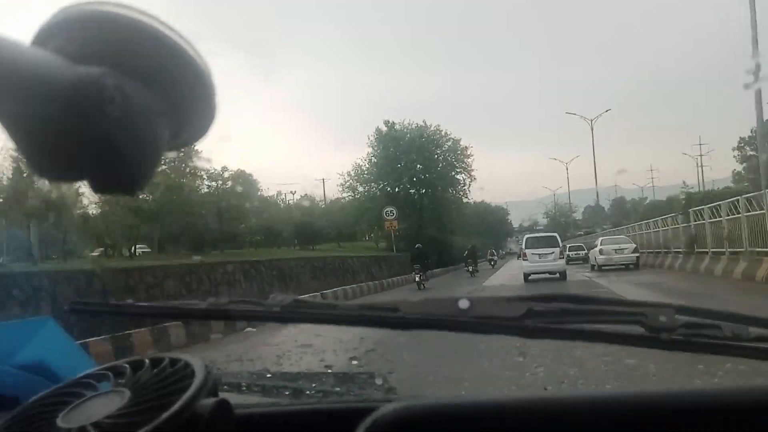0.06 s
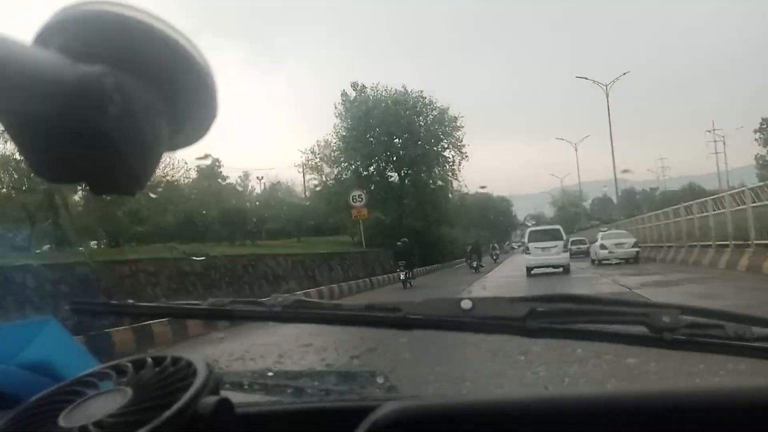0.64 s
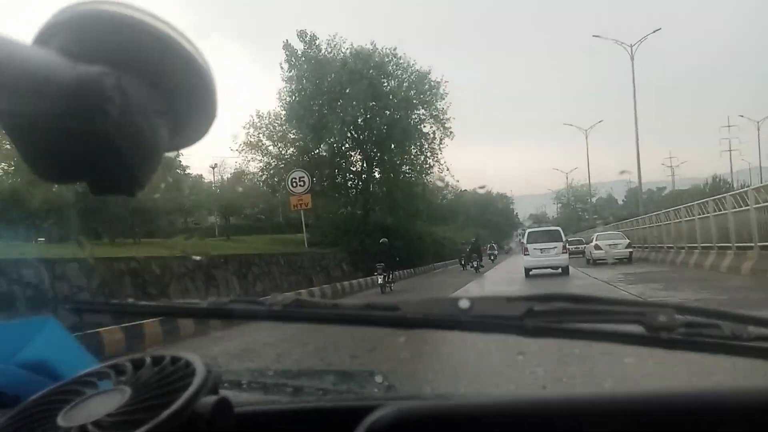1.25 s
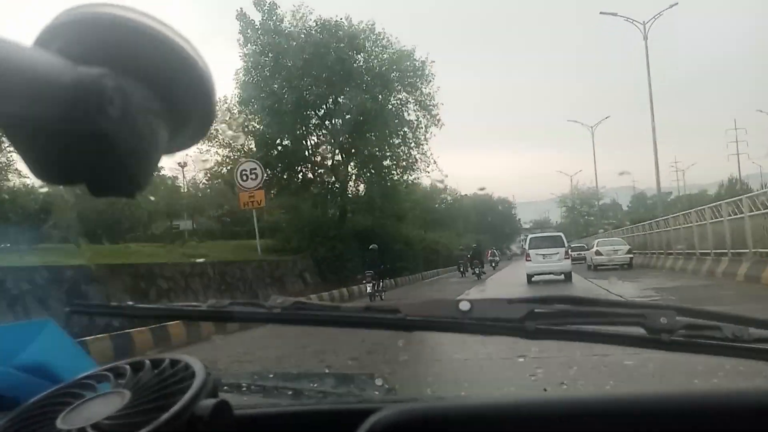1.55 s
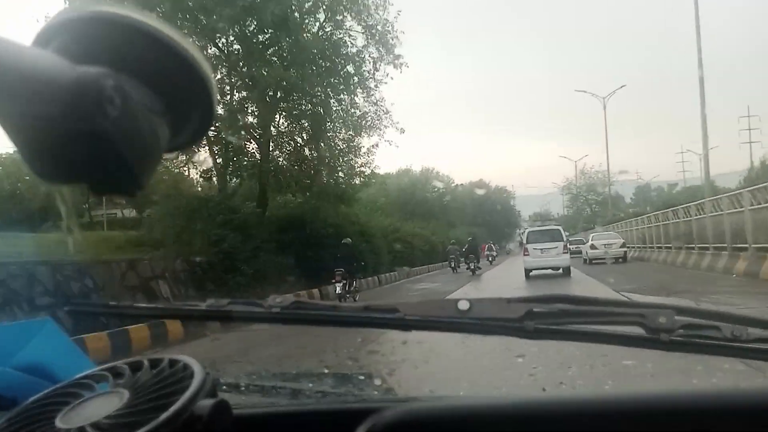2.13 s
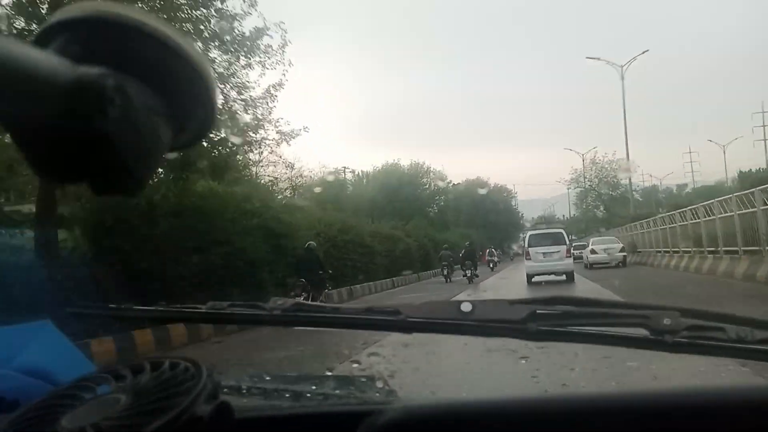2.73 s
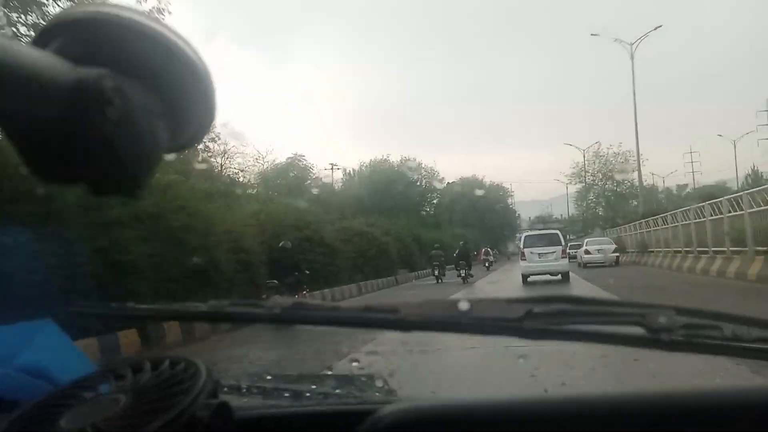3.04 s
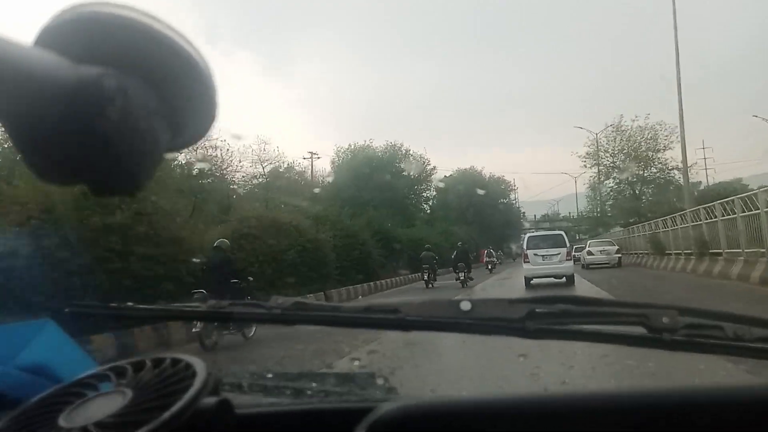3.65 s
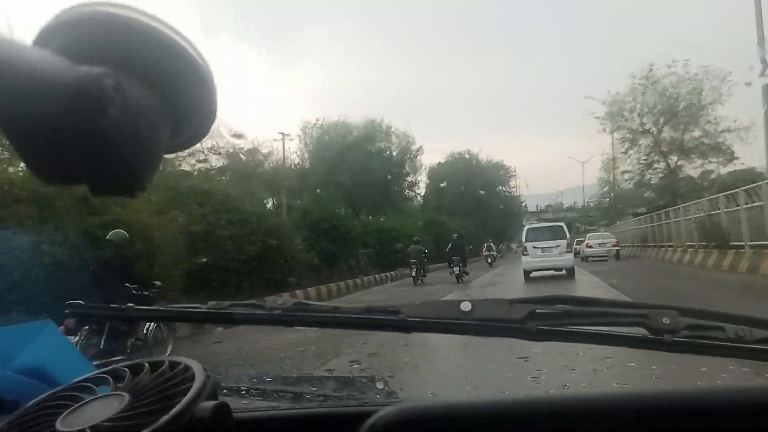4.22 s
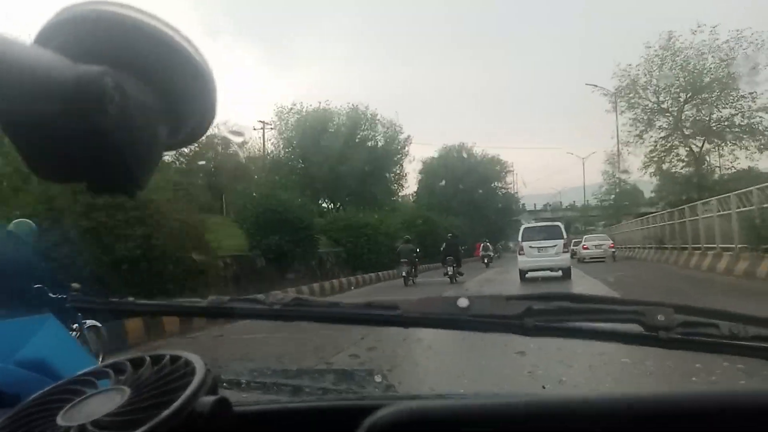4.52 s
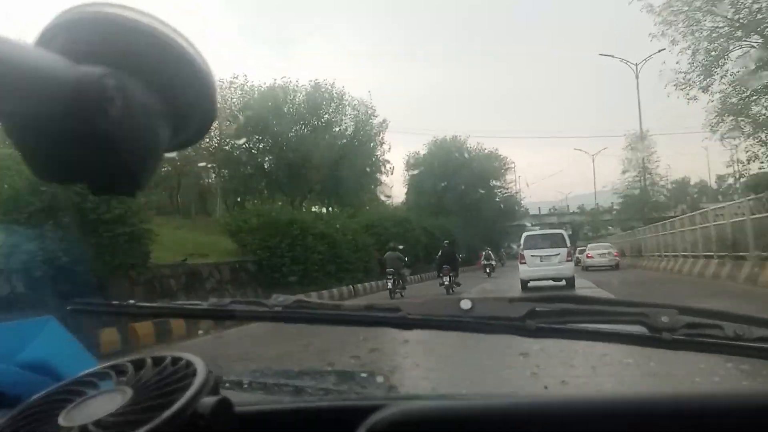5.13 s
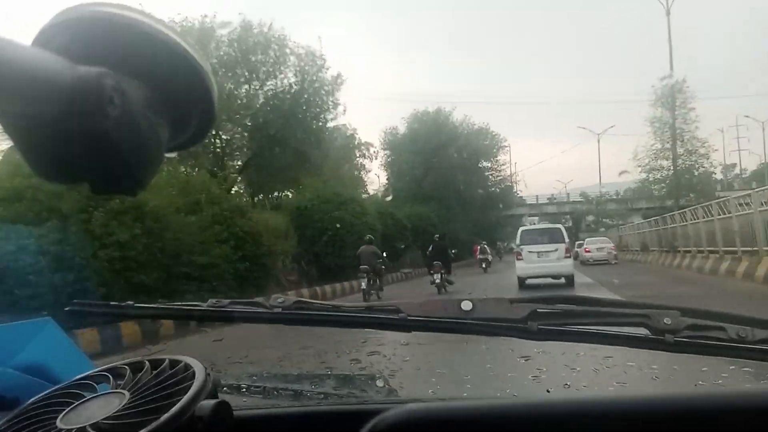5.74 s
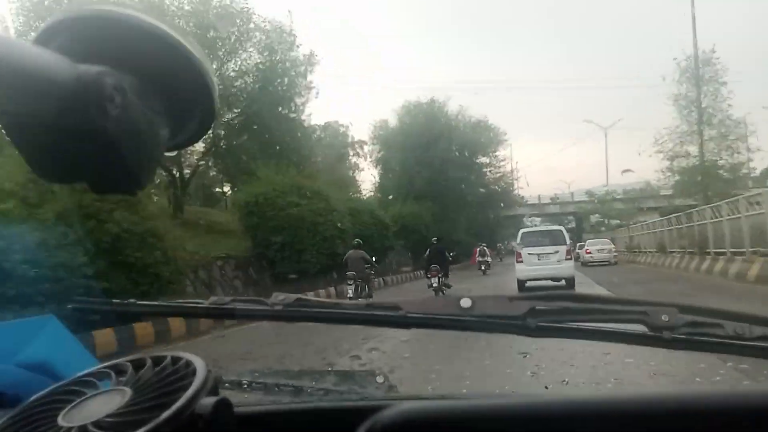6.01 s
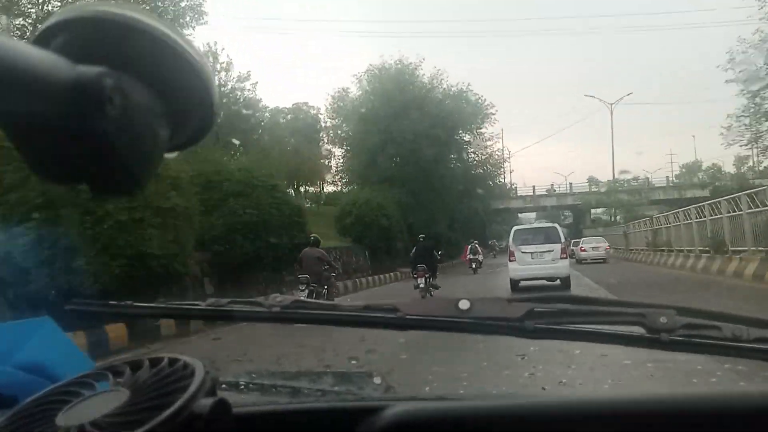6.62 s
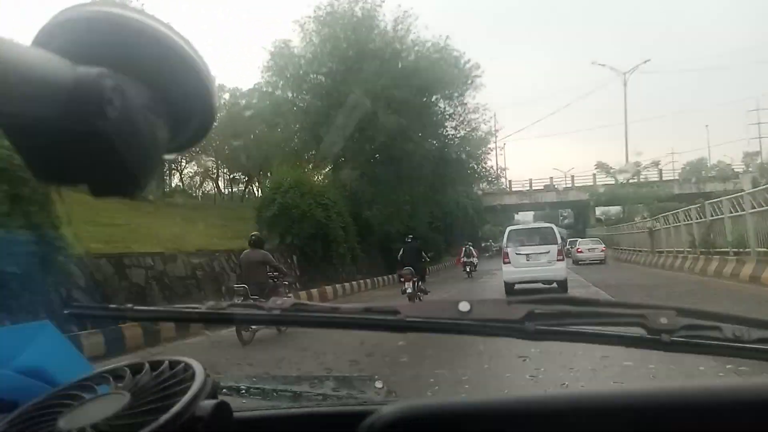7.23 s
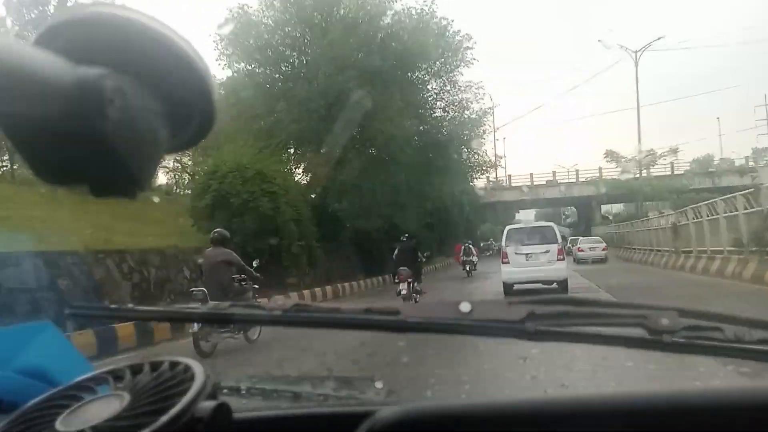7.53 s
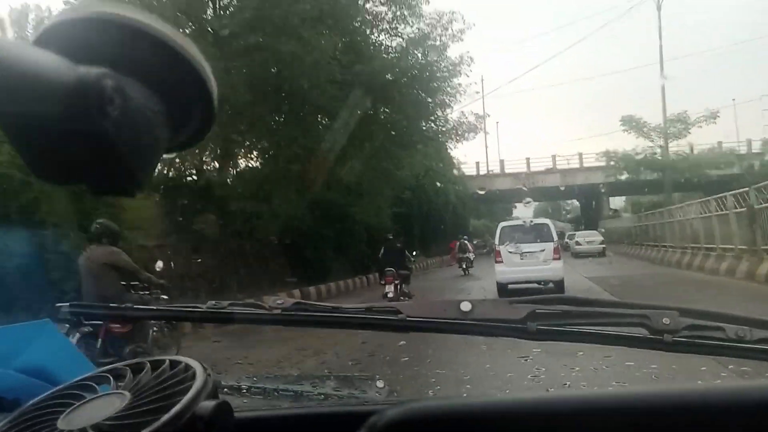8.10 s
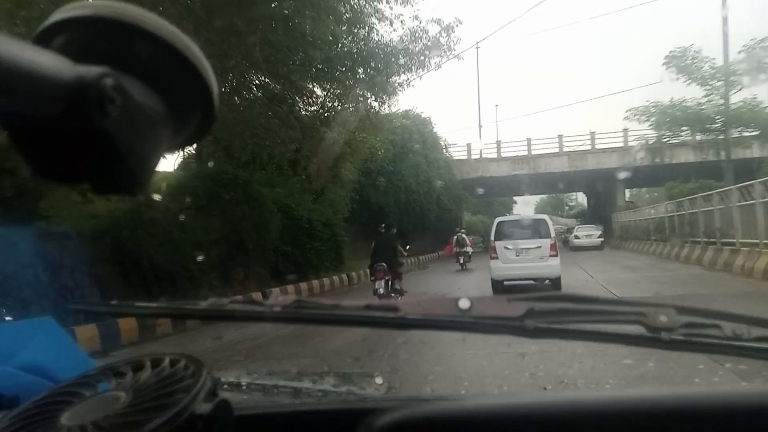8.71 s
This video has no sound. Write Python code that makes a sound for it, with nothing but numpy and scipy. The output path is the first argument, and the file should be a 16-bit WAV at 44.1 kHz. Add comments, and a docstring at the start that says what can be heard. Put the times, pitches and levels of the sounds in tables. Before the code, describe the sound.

A small car rumbles and booms along a damp road, heard from just behind the windscreen, with steady tyre roar and a faint engine hum. Loose plastic trim rattles at the start, stray drops tick on the glass throughout, and bumps give dull knocks. Past the middle, soft spray hisses up and a puddle swishes faintly by. Muffled traffic alongside swells near the end.

```python
"""A small car's body rumbles and booms, heard from inside, as a damp road shakes it and bumps knock it.
The tyres roar, their treads sing, and a faint crackle follows their rasp. Stray drops tick on the
windscreen, spray hisses up on a wetter stretch, and a puddle swishes past. Loose plastic trim rattles,
clicks and squeaks, and a small part jingles. Behind it all the engine hums faintly, and the roar of
traffic alongside swells near the end."""
import sys
import numpy as np
from scipy import signal
from scipy.fft import rfft, irfft, next_fast_len
from scipy.io import wavfile
from scipy.ndimage import uniform_filter1d, minimum_filter1d, map_coordinates

SR = 44100
rng = np.random.default_rng(int(sys.argv[2]) if len(sys.argv) > 2 else 0)


def file_out(sig):
    """Save sig as 16-bit WAV at sys.argv[1]."""
    # one column per channel
    cols = np.atleast_2d(sig).T
    # limit, then scale
    lim = np.clip(cols, -1, 1)
    pcm = np.round(lim * 32767).astype(np.int16)
    wavfile.write(sys.argv[1], SR, pcm)


N = 390726
TIME = np.arange(N) / SR

# Table levels are starting points: the functions add their own gains. t60 is the time to fade by 60 dB.
# how hard the road shakes the car: t/s, suspension thud/dB, body rumble/dB, cabin boom/dB
SHAKE = [(0, -32, -26, -27.5), (0.4, -31.5, -23, -26.5), (1.4, -31, -25.5, -25), (2.2, -30, -26.5, -28.5),
         (2.6, -35, -25.5, -24.5), (2.9, -35.5, -25.5, -27.5), (3.3, -30, -26.5, -26.5),
         (4.3, -32.5, -26.5, -27.5), (4.95, -33, -28.5, -29), (5.5, -36, -27.5, -29.5),
         (5.8, -32, -28, -25.5), (6.15, -36.5, -28.5, -25.5), (6.9, -32, -24.5, -26.5),
         (7.8, -32.5, -25, -27.5), (8.55, -34.5, -26, -27.5), (8.86, -35, -27, -22)]
# dips in the road: middle t/s, length/s, thud boost/dB, rumble boost/dB
ROAD_DIPS = [(0.27, 0.17, 4, 1.5), (0.5, 0.18, 3.5, 1.5), (0.86, 0.23, -3, 1.5), (1.28, 0.4, 2, -1),
             (1.7, 0.6, 7.5, 2.5), (2.67, 0.25, 7, 0.5), (3.0, 0.16, 11, 1), (3.38, 0.28, 0, 4),
             (3.82, 0.14, 6, 2.5), (4.08, 0.24, 4, 5.5), (4.35, 0.22, 0, 5.5), (4.58, 0.2, 13.5, 1),
             (5.24, 0.29, 4, 4.5), (5.85, 0.2, 2, 1.5), (6.3, 0.27, 12, 0.5), (6.6, 0.31, 2, 6.5)]
# tone of the suspension, the body and the cabin air: f/Hz, level/dB
THUD_SPECTRUM = [(12, -57), (22, -37.5), (31, -15.5), (42, -9), (52, -1.5), (61, -0.5), (72, -10.5),
                 (110, -37), (1000, -120)]
RUMBLE_SPECTRUM = [(20, -53), (50, -12.5), (64, -4.5), (80, -0.5), (96, -1), (108, -2.5), (128, -8.5),
                   (150, -28.5), (220, -33), (500, -89.5), (2000, -120)]
BOOM_SPECTRUM = [(90, -38), (127, -12), (145, 2.5), (165, 0.5), (174, -4), (186, -7.5), (208, -11),
                 (228, -11.5), (243, -29), (400, -70), (2000, -120)]

# rolling noise, raspier on the wetter stretch: t/s, roar/dB, rasp/dB
ROLLING = [(0, -32.5, -51.5), (1.1, -32, -57), (2.1, -33.5, -54.5), (3, -33.5, -52), (4.8, -34, -53.5),
           (5.4, -33.5, -47.5), (6.7, -33.5, -48), (8.1, -33.5, -49), (8.86, -33, -45)]
# rough patches of road: middle t/s, length/s, roar boost/dB, rasp boost/dB
ROUGH_PATCHES = [(0.24, 0.19, 2.5, 3), (1.41, 0.13, 3.5, 8), (1.67, 0.067, 4, 8), (3.02, .14, 1.5, 0.5),
                 (3.98, 0.12, 4.5, 8), (5.14, 0.16, 3.5, 0.5), (6.87, 0.66, 2, -1), (7.79, 0.29, 2.5, -5),
                 (8.33, 0.12, -6, 2)]
# tone of the rolling tyres: f/Hz, level/dB
ROAR_SPECTRUM = [(120, -20.5), (230, -1), (285, 1), (340, -0.5), (440, -2.5), (510, -6.5), (590, -6),
                 (720, -11), (810, -7.5), (870, -9.5), (1200, -14), (1600, -16.5), (2400, -27.5),
                 (7000, -104)]
RASP_SPECTRUM = [(600, -18.5), (1200, -1.5), (1600, 3.5), (2100, 1.5), (2450, -13.5), (2900, -17.5),
                 (3450, -14), (3900, -30.5), (5000, -44.5), (10000, -67.5)]
# notes of the tread blocks: f/Hz, half width/Hz, level/dB
TREAD_NOTES = [(938, 45, -4.5), (1037, 66, -1.5), (1120, 41, -5), (1213, 63, -5), (1352, 70, -8)]
# one tread note that wanders with the road surface: t/s, f/Hz, level/dB
TREAD_WHINE = [(0, 1090, -51), (1.1, 1020, -47.5), (1.55, 960, -41.5), (1.9, 1055, -54),
               (2.45, 1085, -47.5), (2.85, 1095, -45), (3.3, 1098, -42), (3.55, 1105, -53),
               (3.85, 1105, -43.5), (4.45, 1075, -47), (4.9, 1122, -40.5), (5.65, 1065, -43),
               (5.95, 1095, -47), (6.6, 1095, -44.5), (7.6, 1085, -39.5), (8.86, 1070, -49.5)]

# knocks over bumps: t/s, level/dB, f/Hz, cabin ring against the knock/dB
KNOCKS = [(0.232, -21, 380, -10), (0.256, -20, 400, -10), (1.3985, -20, 378, -2), (1.41, -21, 360, -6),
          (3.011, -21, 307, -10), (4.3767, -16.5, 404, -12), (5.0665, -12, 380, -16),
          (5.111, -21, 420, -18), (5.6446, -18.5, 395, -14), (5.7261, -13.5, 383, -5),
          (5.7425, -21, 417, -12), (7.808, -19, 381, -14), (8.3116, -14.5, 348, -7), (8.33, -21, 320, -5),
          (8.385, -19, 330, -12), (8.6564, -19, 390, -14)]
# ringing notes of the body panels: f/Hz, level/dB, t60/s
PANEL_NOTES = [(292, -1.5, 0.12), (348, -6, 0.05), (445, 0, 0.056), (474, -4.5, 0.051)]

# large drops on the windscreen: t/s, level/dB, brightness/(dB per octave), top edge f/Hz
LARGE_DROPS = [(0.063, -19, -9, 3400), (0.153, -27, -5, 3100), (0.188, -21, 0, 3600),
               (0.2264, -13.5, -8, 4200), (0.2504, -22, 7, 3300), (0.2767, -17, -9, 3100),
               (0.3564, -20.5, 4, 3100), (0.5252, -17.5, -3, 3000), (0.8362, -27, 10, 2800),
               (0.8788, -23, 4, 3000), (1.0611, -16.5, -2, 3200), (1.1121, -24.5, -6, 3200),
               (1.1565, -29.0, 3, 3000), (1.1986, -28, 1, 3600), (1.2422, -22.5, -5, 4000),
               (1.3663, -23.5, 2, 2800), (1.6845, -19, -3, 3200), (1.7687, -21.5, -7, 3400),
               (2.3318, -26, -3, 2900), (2.3533, -23, -4, 2400), (2.3794, -26, 5, 3000),
               (2.4399, -20, -3, 3300), (2.5111, -21, -1, 3100), (2.6149, -14, -9, 5300),
               (3.0694, -28, 2, 3200), (3.2176, -20, -2, 3400), (3.5155, -23, 3, 3400),
               (3.7353, -20.5, -2, 3800), (3.8125, -23, 0, 3500), (3.9454, -14, -6.5, 4000),
               (3.9978, -23, 3, 2800), (4.0819, -21, -5, 3500), (4.4857, -25, 4, 3200),
               (4.6479, -22, -9, 3100), (5.0834, -20, -8, 3300), (5.1315, -20, -8, 5200),
               (5.1475, -23, -5, 3300), (5.3298, -23, -1, 3600), (5.6204, -30, -1, 3600),
               (5.8777, -27.5, 8, 3800), (6.2507, -18.5, -7, 3900), (6.3858, -27, -1, 3500),
               (6.8212, -21, -7, 6000), (6.843, -22, -3, 3800), (6.8636, -20, 4, 3300),
               (6.9274, -24, -3, 5200), (7.0156, -23, -5, 3600), (7.2197, -24.0, -6, 3000),
               (7.3891, -15.5, -13, 5000), (7.717, -16, -5.5, 4500), (7.9194, -22.0, 3, 3300),
               (8.2678, -26.0, -4, 3900), (8.3856, -18, -3, 3600), (8.572, -23, 2, 3100),
               (8.8324, -22.5, 4, 3000)]
# tone of the struck glass: f/Hz, level/dB
GLASS_SPECTRUM = [(300, -28), (900, -3), (1550, 11), (2300, 1), (3400, -1), (5500, -14), (16000, -60)]

# clacks of loose trim on rough road: t/s, level/dB, brightness/(dB per octave)
CLACKS = [(0.2279, -34, 2), (0.2335, -29, 5), (0.245, -25, 2), (0.252, -28, 0), (0.263, -28, -1.5),
          (0.2865, -20, -6), (0.2893, -22, 3), (0.316, -25.5, 5), (0.3363, -26, -2), (0.357, -31, 3),
          (1.398, -29, 1)]
# tone of a clack's dull knock: f/Hz, level/dB
CLACK_SPECTRUM = [(300, -25), (800, 0.5), (1250, -1), (1800, -10), (2800, -22), (3800, -35), (6000, -58),
                  (16000, -75)]
# ringing notes of the loose trim: f/Hz, level/dB, t60/s
PLASTIC_NOTES = [(800, -2, .035), (1040, 0, .04), (1450, -3, .03), (2000, -9, .03), (2650, -14, .03),
                 (3450, -19, .035), (4200, -25, .04)]

# water thrown up by the tyres: t/s, splash/dB, fine mist/dB, airy sheen/dB
SPRAY_LEVELS = [(0, -70.5, -81.5, -81), (2.3, -72.5, -84, -81), (3.1, -69, -79, -76),
                (3.75, -63.5, -74.5, -72.5), (4.4, -66, -74.5, -74), (5.05, -63, -72.5, -70),
                (5.65, -59, -68, -64), (6.05, -60.5, -67, -67), (6.5, -61, -62, -65),
                (7.15, -65.5, -67.5, -73.5), (7.9, -65, -73.5, -75), (8.5, -66, -72.5, -72.5),
                (8.86, -62.5, -72.5, -69)]
# tone of the spray, from coarse to finest: f/Hz, level/dB
SPLASH_SPECTRUM = [(1500, -15), (2700, 6.5), (3250, 2.5), (3850, -2), (4500, -0.5), (5200, -3),
                   (6100, -7.5), (7000, -12.5), (8300, -17.5), (10000, -21), (16000, -38)]
MIST_SPECTRUM = [(5000, -24), (8600, -18.5), (9500, -4), (10200, -0.5), (11200, 1.5), (12300, -4.5),
                 (13900, -6), (15800, -7)]
SHEEN_SPECTRUM = [(9000, -42), (12500, -17), (13900, -8.5), (14700, 1), (15300, 2), (15900, -2)]
# the falling swish of a puddle: t/s, centre f/Hz, level/dB
PUDDLE_SWISH = [(4.6, 5410, -86), (5.3, 5120, -73), (5.62, 5090, -61.5), (5.95, 4690, -60.5),
                (6.2, 3960, -60), (6.45, 3360, -62), (7.1, 3110, -87)]
# ringing notes of the wheel arch: f/Hz
ARCH_HZ = [4350, 4808, 5296, 5854, 6400]

# dashboard clicks: t/s, level/dB, lower treble boost/dB
CLICKS = [(0.2279, -51, 8), (0.253, -46, 0), (0.3128, -34.5, -2), (0.3435, -40, -11), (0.56, -53, -21),
          (1.1851, -52, -12), (1.3961, -56, 2), (1.6926, -49, -5), (1.7289, -49, -3), (1.7947, -47, -16),
          (2.1998, -47.5, -11), (2.3056, -46.5, -10), (2.4248, -47, -12), (2.611, -50, -8),
          (3.0289, -48.5, -8), (3.1438, -52, -17), (3.6788, -38.5, 0.5), (4.3065, -46, -8),
          (5.1474, -52, 2), (6.0116, -47, -9), (7.017, -49, -14), (7.3636, -49, -8), (7.405, -48, -13),
          (7.6126, -46, -8), (8.68, -54, -21), (8.72, -56, -14)]
# tone of a click's lower and upper treble: f/Hz, level/dB
CLICK_LOW_SPECTRUM = [(1500, -32), (3000, -3.5), (4200, -2.5), (5800, -5), (7000, -8), (9000, -23.5),
                      (16000, -47.5)]
CLICK_HIGH_SPECTRUM = [(3000, -30.5), (7000, -9.5), (10500, 0), (13500, -5.5), (15300, 6.5), (17000, -4.5)]
# jingles of a small loose part: t/s, level/dB
JINGLES = [(0.066, -57), (0.087, -62), (0.108, -61), (0.127, -64), (0.497, -62), (0.6842, -65),
           (0.8388, -63), (0.968, -65), (1.0553, -61), (1.1127, -57), (1.1382, -62), (1.18, -58),
           (1.2733, -62), (1.3157, -67), (3.2648, -57), (3.408, -58)]
# ringing notes of that part: f/Hz, level/dB, t60/s
JINGLE_NOTES = [(8250, 0, .03), (9300, -3, .025), (11400, -1, .022), (12400, -4, .016)]

# notes of the engine hum: multiple of the firing rate, level/dB
ENGINE_NOTES = [(1, -40), (2, -38.5), (3, -63), (4, -50.5)]
# traffic alongside: t/s, level/dB
TRAFFIC_LEVEL = [(0, -58), (1.5, -46.5), (2.6, -49), (5, -45.5), (6.8, -42.5), (7.6, -40), (8.3, -32),
                 (8.86, -31)]
# tone of that traffic through the windows: f/Hz, level/dB
TRAFFIC_SPECTRUM = [(150, -16), (330, 3.5), (490, -4.5), (580, 5.5), (720, -2), (800, 5.5), (880, -7),
                    (1200, -2), (1400, -11), (1600, -30.5), (3000, -28), (9000, -89)]


def body():
    """Uneven road works the suspension, its texture shakes the car's shell, and the cabin air booms."""
    thud_boost, rumble_boost = boosts(ROAD_DIPS)
    thud, rumble, boom = levels(SHAKE)
    thud *= waver(2.5, per_s=8) * steadied(noise(THUD_SPECTRUM), span_s=0.3)
    rumble *= waver(0.5, per_s=18) * steadied(noise(RUMBLE_SPECTRUM), span_s=0.22)
    boom *= waver(1.37, per_s=16) * steadied(noise(BOOM_SPECTRUM), span_s=0.14)
    return thud_boost * thud + rumble_boost * rumble + boom


def tyres(sing_start_db=-44, sing_db_per_s=1.06):
    """Rolling tyres roar and rasp on the road; their tread blocks ring, louder as the car goes on."""
    roar, rasp = boosts(ROUGH_PATCHES) * levels(ROLLING)
    surface = drift(per_s=25)  # the same road texture sways both roar and rasp
    tread = sum(gain_of(db) * noisy_note(hz, 2 * half_width) for hz, half_width, db in TREAD_NOTES)
    sing_level = gain_of(sing_start_db + sing_db_per_s * TIME) * waver(1.5, per_s=14)
    rasp *= gain_of(surface) * flicker(noise(RASP_SPECTRUM), depth_db=6.5, patch_size=3)
    roar *= gain_of(0.27 + 0.87 * surface) * noise(ROAR_SPECTRUM)
    return roar + rasp + sing_level * unit_rms(tread) + gliding(TREAD_WHINE, width_hz=60)


def bumps(cabin_hz=163, cabin_t60=0.13, detune=0.051, push_cycles=0.89, panels_db=-10, lead_s=0.01):
    """Each bump gives the body a short, dull push; the panels and the cabin air ring after it."""
    out, t = np.zeros(N), np.arange(SR // 3) / SR
    cabin = unit_peak(t * fade(t, cabin_t60) * sine(cabin_hz, t))
    for s, db, pitch_hz, cabin_db in KNOCKS:
        cycles = pitch_hz * (t - lead_s)
        push = np.exp(-(cycles / push_cycles) ** 2) * np.cos(2 * np.pi * (cycles + rng.random()))
        add(out, s - lead_s, gain_of(db) * push)
        ring = sum(gain_of(note_db) * fade(t, t60) * sine(hz * (1 + detune * rng.uniform(-0.5, 1)), t)
                   for hz, note_db, t60 in PANEL_NOTES)
        panels = unit_peak(ring * rise(t, 0.0039))
        add(out, s, gain_of(db) * (gain_of(panels_db) * panels + gain_of(cabin_db) * cabin))
    return out


def windscreen(gain_db=-2.5, ring_db=-16, small_count=90, small_db=(-44, -33), small_edge_hz=3000):
    """Each drop gives the stiff glass a quick push and a faint ring; small drops fall at random."""
    out, size = np.zeros(N), 128
    hz = np.fft.rfftfreq(size, 1 / SR)
    small_drops = [(when * N / SR, np.interp(strength, (0, 1), small_db),
                    2 - 4 * dullness, small_edge_hz * 2 ** (reach / 2))
                   for when, strength, dullness, reach in rng.random((small_count, 4))]
    for s, db, brightness, edge_hz in list(LARGE_DROPS) + small_drops:
        tone = gain_of(spectrum_db(GLASS_SPECTRUM, hz) + brightness * np.log2(hz + hz[1]))
        tone /= np.sqrt(1 + (hz / edge_hz) ** 24)  # steep cut above the top edge
        push = unit_peak(np.fft.fftshift(irfft(tone)) * np.hanning(size))
        add(out, s, gain_of(db + gain_db) * push)
        ring = tick(push, scatter=0.93, t60=0.035, rise_s=0.00043)
        add(out, s, gain_of(db + gain_db + ring_db) * ring)
    return out


def rattle(knock_db=-2, ring_db=-3, vary_db=3):
    """Loose plastic clacks against its seat: a dull knock and a short ring, a new mix of notes each time."""
    out, t = np.zeros(N), np.arange(4096) / SR
    onset = 1 - np.exp(-(t / 0.0007) ** 2)
    for s, db, brightness in CLACKS:
        knock = pulse([(hz, level + brightness * np.log2(hz)) for hz, level in CLACK_SPECTRUM])
        add(out, s, gain_of(db + knock_db) * tick(knock, scatter=0.07, t60=0.03, rise_s=0.0005))
        ring = np.zeros(len(t))
        for hz, note_db, t60 in PLASTIC_NOTES:
            strength = gain_of(note_db + brightness * np.log2(hz) + vary_db * rng.standard_normal())
            ring += strength * fade(t, t60) * sine(hz * rng.uniform(0.91, 1.04), t)
        add(out, s, gain_of(db + ring_db) * unit_peak(ring * onset))
    return out


def crackle(gain_db=-6, centre_hz=2620):
    """Faint, short ringing pings near 2.6 kHz crackle, rising and falling with the tyres' rasp."""
    _, rasp = boosts(ROUGH_PATCHES) * levels(ROLLING)
    pings = patter(([0], [centre_hz]), per_s=260, scatter_octaves=0.23, ring_s=0.036)
    return gain_of(gain_db) * rasp * pings


def spray(drops_per_s=2500, spread_db=3.5, graininess=0.5):
    """Countless tiny droplets merge into a hiss in the wheel arches: the finer, the smoother."""
    out = np.zeros(N)
    sizes = gain_of(spread_db * np.minimum(rng.exponential(1, N), 5))
    droplets = unit_rms(sizes * (rng.random(N) < drops_per_s / SR))
    splash, mist, sheen = levels(SPRAY_LEVELS)
    for level, spectrum, flicker_db in ((splash, SPLASH_SPECTRUM, 4.5), (mist, MIST_SPECTRUM, 4),
                                        (gain_of(3) * sheen, SHEEN_SPECTRUM, 1.5)):
        hiss = shaped(rng.standard_normal(N) + graininess * droplets, spectrum)
        out += level * flicker(hiss, flicker_db, patch_size=2)
    return out * waver(1.87, per_s=40)


def puddle(drops_db=-1, wash_db=-10, arch_db=-8, reach_octaves=0.35):
    """Standing water splatters over a smooth wash, sinking in pitch as it falls behind."""
    s, hz, db = np.transpose(PUDDLE_SWISH)
    centre_hz = np.interp(TIME, s, hz)
    arch = np.zeros(N)
    for note_hz in ARCH_HZ:  # the wheel arch sizzles at each note that the swish passes
        nearness = np.exp(-(np.log2(centre_hz / note_hz) / reach_octaves) ** 2)
        arch += nearness * unit_rms(waver(5, per_s=18) * noisy_note(note_hz, width_hz=150))
    droplets = patter((s, hz), per_s=330, scatter_octaves=0.25, ring_s=0.06)
    splatter = gain_of(drops_db) * droplets + gain_of(arch_db) * arch
    wash = gain_of(wash_db) * gliding(PUDDLE_SWISH, width_hz=4500)
    return gain_of(np.interp(TIME, s, db)) * splatter + wash


def dashboard_clicks(high_db=-2, faint_count=16, faint_db=-63, spread_db=6, faint_lower_db=-11):
    """Plastic on the dashboard clicks sharply; extra faint clicks come at random."""
    out, low, high = np.zeros(N), pulse(CLICK_LOW_SPECTRUM), pulse(CLICK_HIGH_SPECTRUM)
    faint = [(when * N / SR, faint_db + spread_db * strength, faint_lower_db)
             for when, strength in rng.random((faint_count, 2))]
    for s, db, lower_db in list(CLICKS) + faint:
        add(out, s, gain_of(db + high_db) * tick(high, scatter=0.6, t60=0.033, rise_s=0.003))
        add(out, s, gain_of(db + lower_db) * tick(low, scatter=0.54, t60=0.045, rise_s=0.003))
    return out


def dashboard_squeak(start_s=0.199, hz=7250, peak_db=-52):
    """The plastic trim gives one thin, short squeak."""
    out, t = np.zeros(N), np.arange(4096) / SR
    swell = t * np.exp(-t / 0.004)
    add(out, start_s, gain_of(peak_db) * unit_peak(swell * noisy_note(hz, width_hz=280)[:len(t)]))
    return out


def jingle(gain_db=-1, vary_db=3):
    """A small loose part buzzes briefly in its seat, with a new mix of notes each time."""
    out, t = np.zeros(N), np.arange(2048) / SR
    notes = [(noisy_note(hz, width_hz=700), db, t60) for hz, db, t60 in JINGLE_NOTES]
    for s, db in JINGLES:
        ring = np.zeros(len(t))
        for note, note_db, t60 in notes:
            strength = gain_of(note_db + vary_db * rng.standard_normal())
            ring += strength * fade(t, t60) * note[round(s * SR):][:len(t)]
        add(out, s, gain_of(db + gain_db) * unit_peak(ring * rise(t, 0.002)))
    return out


def engine(firing_hz=82.8, wander=0.01506):
    """The engine fires at a nearly steady rate and hums at that rate and its multiples."""
    firings = np.cumsum(firing_hz * (1 + wander * drift(per_s=5))) / SR
    return sum(gain_of(db) * waver(2.5, per_s=19) * np.sqrt(2) * np.sin(2 * np.pi * multiple * firings)
               for multiple, db in ENGINE_NOTES)


def traffic():
    """Other vehicles roar alongside, dulled by the windows."""
    level, = levels(TRAFFIC_LEVEL)
    return level * noise(TRAFFIC_SPECTRUM)


def gain_of(db):
    """Turns decibels into a number to multiply a sound by."""
    return 10 ** (np.asarray(db) / 20)


def unit_rms(x):
    """Scales a sound so that its average size (rms) is 1."""
    return x / np.sqrt(np.mean(x ** 2) + 1e-20)


def unit_peak(x):
    """Scales a sound so that its highest peak is 1."""
    return x / (abs(x).max() + 1e-20)


def sine(hz, t):
    """A pure tone."""
    return np.sin(2 * np.pi * hz * t)


def rise(t, rise_s):
    """A soft start that climbs from 0 towards 1."""
    return 1 - np.exp(-t / rise_s)


def fade(t, t60):
    """Dies away by 60 dB every t60 seconds."""
    return gain_of(-60 * t / t60)


def add(mix, s, sound):
    """Mixes a sound in, starting at s seconds."""
    part = mix[max(round(s * SR), 0):][:len(sound)]
    part += sound[:len(part)]


def levels(table):
    """One gain curve over time for each dB column of a table."""
    s, *columns = np.transpose(table)
    return [gain_of(np.interp(TIME, s, db)) for db in columns]


def boosts(table):
    """One gain curve for each dB column; every row makes a brief, smooth swell or dip."""
    return gain_of(sum(np.outer(db, np.cos(np.pi * np.clip((TIME - s) / length, -0.5, 0.5)) ** 2)
                       for s, length, *db in table))


def drift(per_s):
    """A random curve of rms 1 that heads for a new value per_s times a second."""
    targets = rng.standard_normal(4096)
    return unit_rms(map_coordinates(targets, [TIME * per_s], order=1, mode="wrap"))


def waver(depth_db, per_s):
    """A gain that wanders up and down by about depth_db."""
    return gain_of(depth_db * drift(per_s))


def spectrum_db(spectrum, hz):
    """The level at hz, joining the table's points by straight lines on a pitch scale."""
    table_hz, db = np.transpose(spectrum)
    return np.interp(np.log(hz + 1), np.log(table_hz + 1), db)


def shaped(x, spectrum):
    """Filters a sound with a spectrum, at rms 1."""
    size = next_fast_len(N)
    gain = gain_of(spectrum_db(spectrum, np.fft.rfftfreq(size, 1 / SR)))
    return unit_rms(irfft(rfft(x, size) * gain, size)[:N])


def noise(spectrum):
    """Random vibration with a given spectrum."""
    return shaped(rng.standard_normal(N), spectrum)


def steadied(x, span_s):
    """Evens out the slow swells of a vibration and keeps its quick throbbing."""
    size = int(span_s * SR)
    power = uniform_filter1d(uniform_filter1d(x ** 2, size), size)
    return x / np.sqrt(abs(power) + 1e-9)


def flicker(x, depth_db, patch_size, from_hz=2000):
    """The treble flickers: mostly above from_hz, the level wanders in patches of time and pitch."""
    hz, _, slices = signal.stft(x, SR, nperseg=512, noverlap=384)
    patches = rng.standard_normal(slices.shape)
    for _ in range(2):
        patches = uniform_filter1d(patches, 2 * patch_size, axis=1)  # smooth over time
        patches = uniform_filter1d(patches, patch_size, axis=0)  # smooth over frequency
    treble_depth_db = depth_db / (1 + (from_hz / (hz[:, None] + 1)) ** 2)
    slices *= gain_of(treble_depth_db * unit_rms(patches))
    return unit_rms(signal.istft(slices, nperseg=512, noverlap=384)[1][:N])


def noisy_note(hz, width_hz):
    """A band of noise around a fixed or moving pitch, at rms 1; narrower sounds more like a note."""
    feedback = np.exp(-np.pi * width_hz / SR)
    wobble = rng.standard_normal(N) + 1j * rng.standard_normal(N)
    for _ in range(3):
        wobble = signal.lfilter([1 - feedback], [1, -feedback], wobble)
    cycles = np.cumsum(hz * np.ones(N)) / SR
    return unit_rms((wobble * np.exp(2j * np.pi * cycles)).real)


def gliding(table, width_hz):
    """A band of noise that follows a table of time, pitch and level."""
    s, hz, db = np.transpose(table)
    return gain_of(np.interp(TIME, s, db)) * noisy_note(np.interp(TIME, s, hz), width_hz)


def pulse(spectrum, size=1024):
    """The sound of one sharp tap with a given spectrum."""
    log_gain = np.log(gain_of(spectrum_db(spectrum, abs(np.fft.fftfreq(size, 1 / SR)))))
    front_loaded = np.exp(np.conj(signal.hilbert(log_gain)))  # packs the energy at the start
    return np.fft.ifft(front_loaded).real[:size // 2]


def tick(tap, scatter, t60, rise_s):
    """A tap with a quick, dense burst of echoes, at peak 1."""
    t = np.arange(4096) / SR
    echoes = scatter * rng.standard_normal(len(t)) * fade(t, t60) * rise(t, rise_s)
    echoes[int(rise_s * SR)] += 1  # the tap itself
    return unit_peak(signal.fftconvolve(echoes, tap))


def patter(centre, per_s, scatter_octaves, ring_s, spread_db=3):
    """Tiny random pings, each at its own pitch near a centre curve (times, pitches), at rms 1."""
    out, t = np.zeros(N), np.arange(2048) / SR
    outline = rise(t, 0.0006) * fade(t, ring_s)
    for when, pitch, smallness, damping in rng.random((int(per_s * N / SR), 4)):
        s = when * N / SR
        hz = np.interp(s, *centre) * 2 ** (scatter_octaves * np.arcsin(2 * pitch - 1))
        strength = gain_of(-spread_db * np.log(smallness + 0.03))
        add(out, s, strength * outline * np.exp(-damping * t / ring_s) * sine(hz, t))
    return unit_rms(out)


def scene():
    """Everything as it reaches one microphone behind the windscreen."""
    driving = body() + engine() + tyres() + crackle() + traffic() + bumps()
    water = windscreen() + spray() + puddle()
    loose_parts = rattle() + dashboard_clicks() + dashboard_squeak() + jingle()
    return (driving + water + loose_parts)[None]


def record(dry):
    """A limiter smoothly turns down the highest peaks; then a filter cuts the very top of the treble."""
    ceiling, smooth_samples, cutoff_hz = 0.31, 441, 15850
    gain = minimum_filter1d(ceiling / np.maximum(abs(dry), ceiling), 2 * smooth_samples)
    limited = dry * uniform_filter1d(uniform_filter1d(gain, smooth_samples), smooth_samples)
    low_pass = signal.firwin(1023, cutoff_hz, window=("kaiser", 9), fs=SR)
    return signal.oaconvolve(limited, low_pass[None], "same")


dry = scene()
out = record(dry)
file_out(out)
```